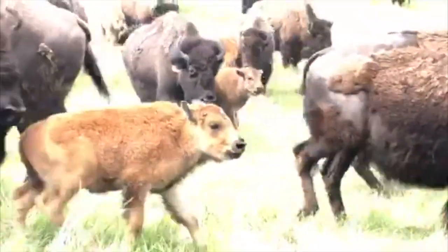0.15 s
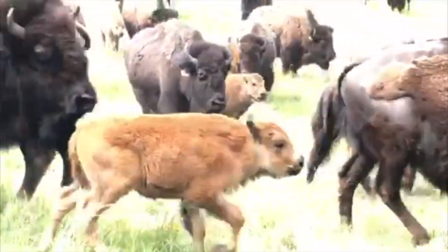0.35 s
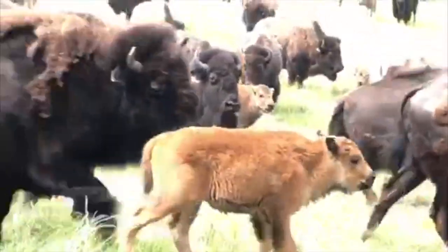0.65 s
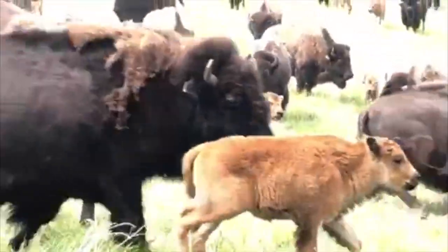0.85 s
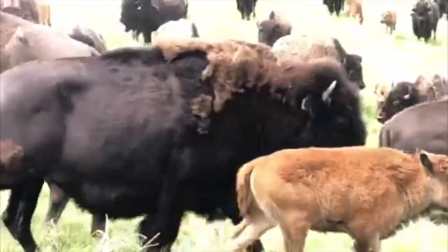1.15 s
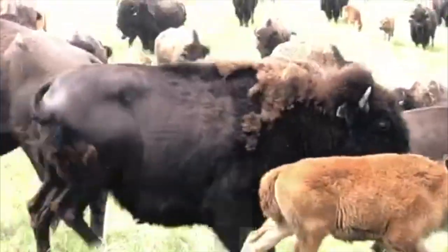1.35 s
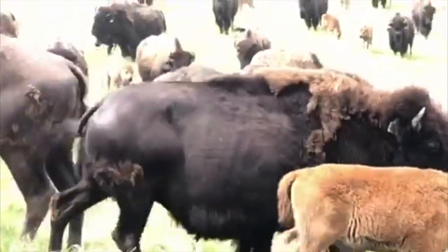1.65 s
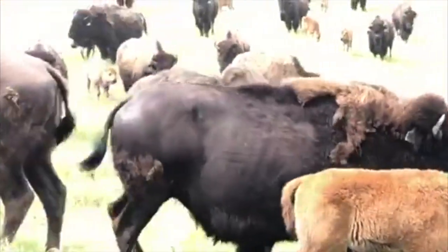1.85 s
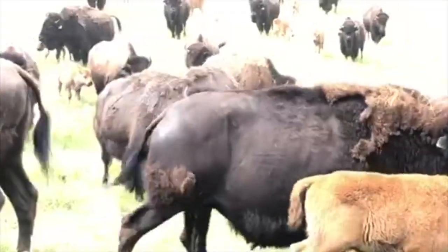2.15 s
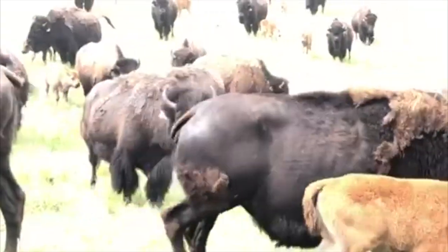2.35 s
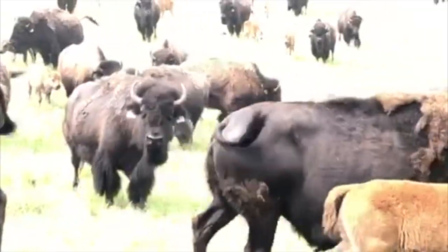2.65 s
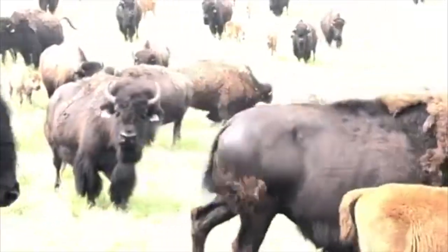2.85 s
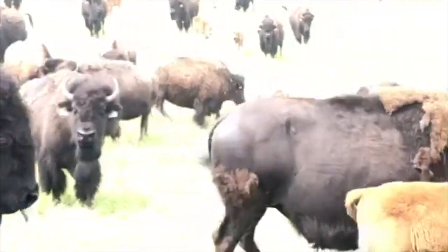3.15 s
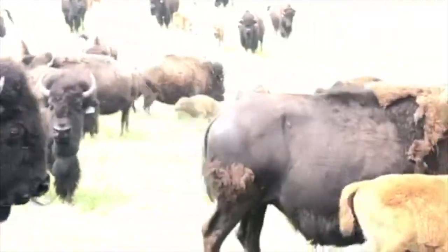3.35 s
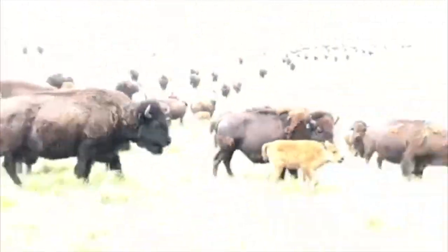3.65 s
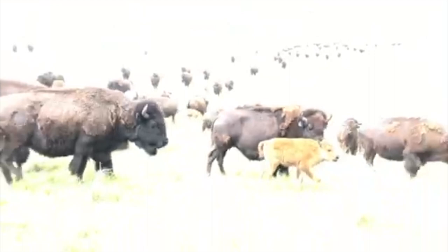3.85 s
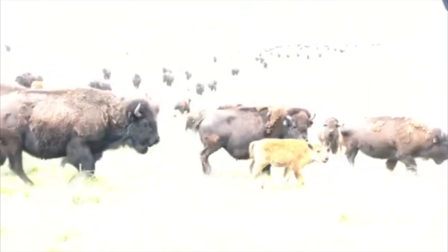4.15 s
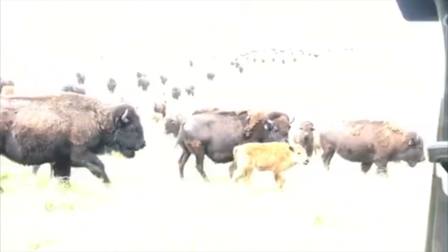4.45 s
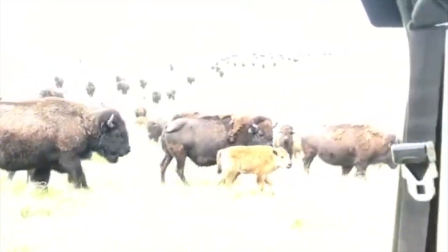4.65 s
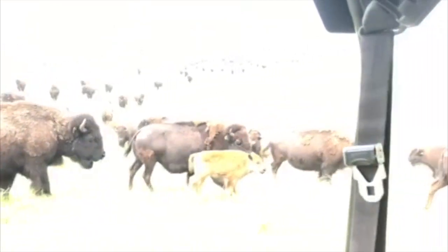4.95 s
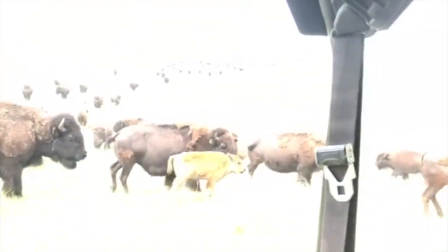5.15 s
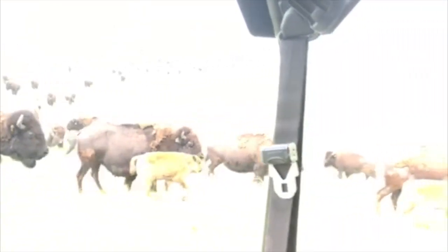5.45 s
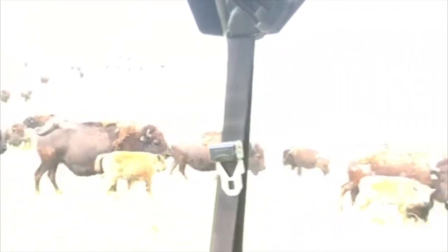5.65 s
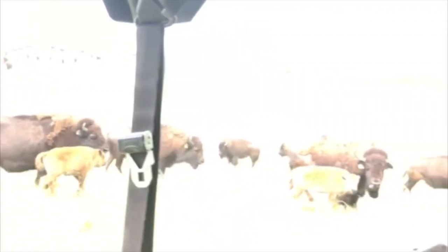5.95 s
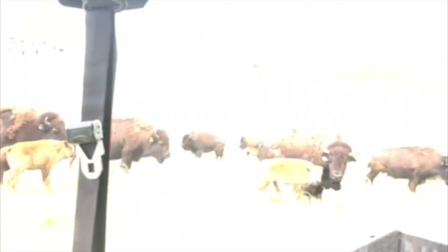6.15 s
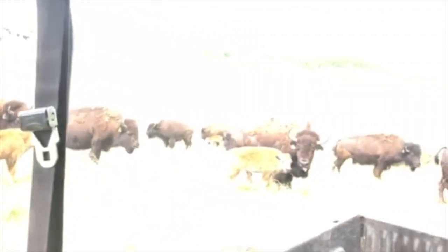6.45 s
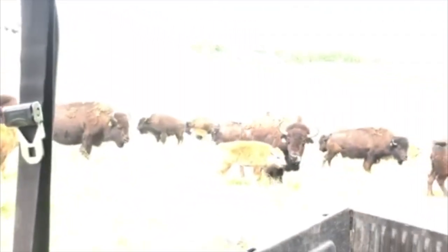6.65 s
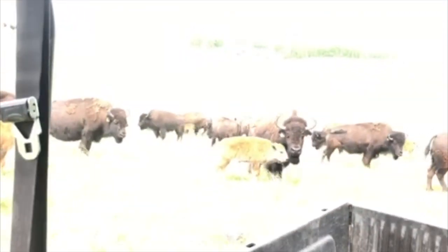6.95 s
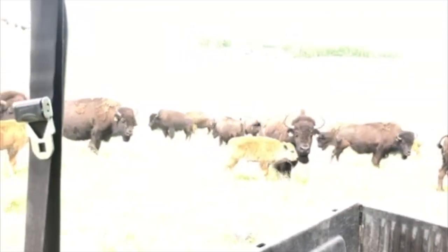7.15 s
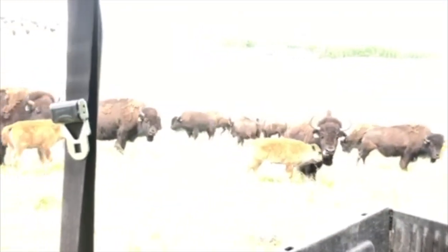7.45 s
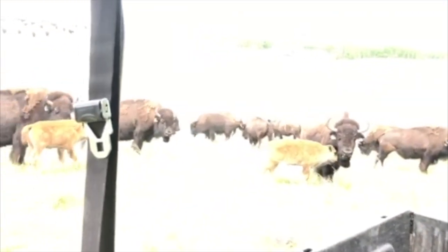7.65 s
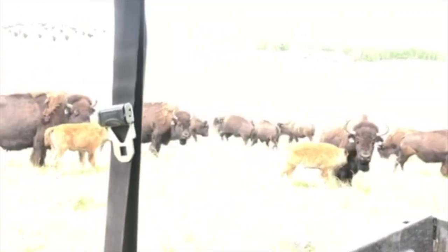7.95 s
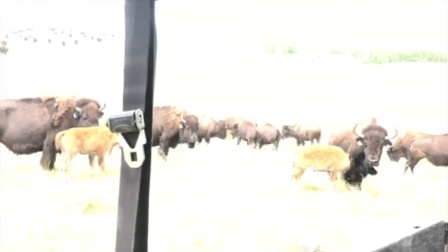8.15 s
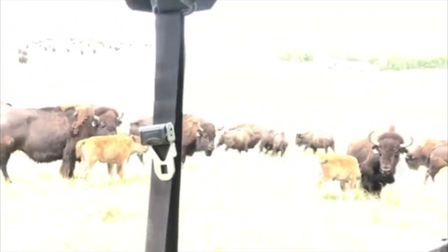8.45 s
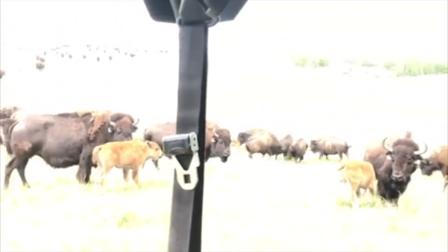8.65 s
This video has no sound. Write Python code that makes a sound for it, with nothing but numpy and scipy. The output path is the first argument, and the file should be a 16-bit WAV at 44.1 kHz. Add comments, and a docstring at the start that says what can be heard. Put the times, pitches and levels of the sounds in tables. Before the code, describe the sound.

Throughout about 9 seconds, a bison herd makes a low, uneven bed of dull hoof thuds, muffled distant grunts, dry scuffing and fine grass rustle, quieter after about 7 s. A close, rough grunt comes at 0.4-0.6 s, a rapid rattle of deep throaty pulses, about thirty per second, with chesty and nasal ring. From 1 to 4 s there are muffled farther grunts around 1.3 and 2.7, heavy treads, and crisp stalk snaps, sharpest at 2.4-2.7, another at 3.4. Short grunts follow at 4.0, 4.5, a faint one at 5.0, 5.2, a stronger one at 5.6, a raspy one at 6.3 with a weak tail at 6.6, and a strong clearer one at 6.9. Thin, mostly falling bird chirps come at 7.5-7.9 and 8.35-8.7. The loudest, roughest grunt at 7.9 runs into another until 8.3, with nostril hiss. Close, dry, open-air perspective with slight short reflections.

```python
"""A bison herd walks past over open pasture, some animals very close.
From the start shaped noise makes the herd's rumble and the grass swish; filtered bursts make scuffs and snaps.
Soon the grunts begin: trains of slow glottal pulses ring chest, mouth and nose, some with a breathy hiss.
Late on, a far bird chirps in short gliding sines, and bursts of air hiss through the nostrils."""
import sys
import numpy as np
from scipy import signal
from scipy.fft import rfft, irfft, next_fast_len
from scipy.io import wavfile

SR = 44100
rng = np.random.default_rng(int(sys.argv[2]) if len(sys.argv) > 2 else 0)


def output_pcm(signal):
    """Save a mono or channel-first signal as 16-bit PCM at the path in sys.argv[1].

    Samples are clipped to [-1, 1] before scaling.
    """
    pcm = np.clip(np.atleast_2d(signal).T, -1, 1) * 32767
    wavfile.write(sys.argv[1], SR, np.round(pcm).astype(np.int16))


N = 388962
T = np.arange(N) / SR   # s

# Levels in the tables are nominal: the sources apply their own trims.
# steady stir of the herd: time_s, thuds_db, far_voices_db, scuffing_db
HERD_STIR = [(0, -51, -55, -53), (.75, -48.5, -51.5, -53.5), (1.5, -50, -52.5, -55),
             (3.3, -49, -54.5, -56.5), (4.4, -51.5, -53.5, -57.5), (6.75, -50, -54.5, -57),
             (7.3, -54.5, -60, -58.5), (8.82, -59, -58.5, -56.5)]
# spectrum of the ground thuds: freq_hz, density_db_per_hz
THUD_SPECTRUM = [(25, -50), (40, -8), (56, -6.5), (75, 3.5), (115, 2.5)]
# spectrum of the far voices: freq_hz, density_db_per_hz
RUMBLE_SPECTRUM = [(135, -8), (172, 2.5), (215, -5), (280, -9.5), (350, -9), (410, -22), (520, -25.5)]
# spectrum of scuffing and far breath: freq_hz, density_db_per_hz
SCUFF_SPECTRUM = [(300, -3.5), (500, 2), (800, 1.5), (1150, 1), (1600, -3.5), (2300, -8), (3200, -12)]
# dull thuds of heavy treading: middle_s, length_s, level_db
HEAVY_TREADS = [(1.968, 0.071, -48), (2.56, 0.1, -46.5), (2.726, 0.044, -41), (3.026, 0.11, -43),
                (3.59, 0.094, -49), (3.973, 0.12, -45), (6.005, 0.19, -44), (6.617, 0.08, -45),
                (7.67, 0.21, -52.5), (8.496, 0.32, -42.5)]
# muffled grunts and snorts farther off, and at 5.826 s the breath trailing off after the close grunt just
# before: middle_s, length_s, voice_db, breath_db
FAR_CALLS = [(0.223, 0.085, -50.5, -58), (1.14, 0.1, -46.5, -57), (1.31, 0.075, -41, -49.5),
             (1.386, 0.06, -40, -52), (1.923, 0.094, -43.5, -46.5), (2.502, 0.12, -50, -53),
             (2.699, 0.056, -41.5, -44.5), (3.059, 0.15, -43, -55), (3.595, 0.077, -48, -80),
             (5.445, 0.097, -49.5, -58.5), (5.826, 0.1, -60, -55), (5.99, 0.2, -51, -63),
             (6.386, 0.28, -46.5, -70), (8.41, 0.28, -51, -69), (8.638, 0.11, -52.5, -52.5)]
# rustle of the grass, louder while animals pass close: time_s, level_db
GRASS_LEVEL = [(0, -53.5), (1.7, -52.5), (2.05, -53.5), (2.8, -49), (3.55, -52), (3.75, -55), (4.7, -57),
               (7.1, -56), (7.35, -59.5), (7.9, -59.5), (8.4, -55), (8.82, -55.5)]
# spectrum of the grass: freq_hz, density_db_per_hz
GRASS_SPECTRUM = [(1500, -7), (2400, -6.5), (3400, 2), (6000, 2), (8500, -0.5), (12000, -1), (16000, -2.5)]
# a leg sweeps through tall grass: middle_s, length_s, level_db
LEG_SWEEPS = [(.38, 0.94, -53.5), (1.857, 0.14, -52.5), (2.21, 0.12, -51.5), (3.2, 0.034, -51),
              (3.953, 0.03, -48), (4.9, 0.027, -58), (6.522, 0.22, -55), (7.03, 0.089, -55.5),
              (8.433, 0.13, -55.5)]
# far bird: start_s, length_s, start_hz, end_hz, level_db
BIRD_CHIRPS = [(7.523, 0.043, 4060, 3740, -55), (7.69, 0.051, 4200, 3540, -50),
               (7.765, .02, 5000, 4670, -55), (7.8, 0.034, 4200, 3470, -53), (7.904, 0.04, 4300, 3400, -51),
               (8.353, 0.027, 5300, 4300, -51), (8.434, 0.042, 3400, 3960, -48),
               (8.494, 0.036, 4600, 3840, -50), (8.59, 0.047, 4560, 3870, -49),
               (8.68, 0.013, 4000, 3650, -45), (8.704, 0.033, 4400, 3680, -47.5)]
# hoof scuffs and snapping stalks: start_s, level_db, centre_hz, width_octaves, decay_s
SCUFFS_AND_SNAPS = [(0.031, -37, 525, 0.63, 0.0021), (0.258, -41.5, 510, 0.46, 0.0027),
                    (0.369, -43, 1960, 1.4, 0.0027), (0.739, -42.5, 460, 0.82, 0.0079),
                    (0.768, -46, 540, 1.1, 0.0021), (0.932, -43, 1790, 0.83, 0.0026),
                    (0.953, -45, 830, 1, 0.0019), (1.218, -46, 5200, 0.84, 0.011),
                    (1.605, -43, 920, 0.88, 0.0021), (2.275, -40, 5870, 2.1, 0.01),
                    (2.419, -38, 7000, 2.3, 0.0091), (2.435, -25.5, 6760, 1.7, 0.00031),
                    (2.488, -34, 4600, 0.69, 0.00079), (2.593, -40.5, 1010, 1.4, 0.0019),
                    (2.655, -33, 2100, 2.6, 0.0039), (2.659, -24.5, 6460, 1.1, 0.00032),
                    (2.689, -42.5, 5000, 2.2, 0.012), (2.81, -44.5, 3860, 1.8, 0.0044),
                    (2.856, -40.5, 8000, 2.5, 0.0034), (2.936, -49, 990, 0.7, 0.0026),
                    (2.98, -48, 12000, 0.76, 0.028), (3.399, -33, 3260, 3.3, 0.0017),
                    (3.57, -43, 8900, 2, 0.0059), (4.849, -41.5, 5500, 8.6, 0.0028),
                    (6.712, -49, 5170, 1.6, 0.0036), (6.793, -47, 820, 0.45, 0.019),
                    (6.857, -34.5, 5360, 0.85, 0.0019), (7.725, -32.5, 4200, 1.77, 0.0014),
                    (8.49, -42.5, 9000, 4, 0.0017), (8.769, -40, 8950, 3, 0.0025)]
# the grunts, the last two run together: first_pulse_s, last_pulse_s, pulses,
#   slowing (share by which the last period exceeds the mean), peak_db, attack_s, swell_db,
#   catch_db (dip in mid-attack), fade_db, openness_db (upper resonances against low ones),
#   roughness (0-1), roughest_at (share of the call)
GRUNT_CALLS = [(0.359, 0.616, 8, -0.0015, -31, 0.059, 9, 3.5, 10, -17, 0.84, 0.62),
               (4.024, 4.118, 4, 0.017, -38, 0.038, -1, 0, -0.5, -15, 0.15, 0.24),
               (4.49, 4.698, 6, -0.028, -37.5, 0.16, 6.5, -2.5, 3.5, -22.5, 0.5, 0.46),
               (4.966, 5.101, 4, 0.0097, -49.5, 0.058, 2, -5, 8, -9.5, 0, 0.4),
               (5.213, 5.341, 4, 0.032, -41.5, 0.024, 7, 2, 6, -10.5, 0.13, 0.57),
               (5.579, 5.787, 7, 0.07, -34, 0.057, 10.5, 12, 3.5, -15.5, 0.28, 0.58),
               (6.302, 6.545, 11, -0.061, -38.5, 0.15, 3.5, 1, 6, -18.5, 0.84, 0.87),
               (6.586, 6.694, 4, 0.0045, -50, .03, -1, 0, 4, -9.5, 0.08, 0.62),
               (6.891, 7.068, 6, 0.015, -30, 0.053, 6.5, 9, 5, -10.5, 0.09, 0.15),
               (7.941, 8.134, 7, -0.0022, -28.5, 0.046, 9.5, 2.5, 5, -15, 0.92, 0.73),
               (8.166, 8.271, 4, 0.0364, -30, 0.033, 2, -6, 7, -12.5, 0.42, 0.6)]
# colour of each grunt: chest_scale (ratio), chest_tilt_db_per_octave,
#   glide (share by which the muzzle and chest resonances rise over the call), wobble (share, pulse to pulse),
#   nostril_breath_db, muzzle_breath_db, chest_rough_share (of the roughness)
GRUNT_COLOURS = [(1.04, -1, 0.05, 0.012, -20.5, -28.5, 0.34), (0.946, -1.5, .002, 0.0036, -28, -28, .5),
                 (0.96, -2.5, 0.026, .008, -22, -37, 0.9), (1.03, 7.5, 0.036, 0.0048, -28, -32, .5),
                 (0.94, -0.5, -0.019, 0.004, -11, -34, .5), (0.963, 2.5, 0.01, 0.016, -25, -29, .3),
                 (1.154, -0.5, 0.0054, 0.0086, -31, -24.5, 0.97), (0.89, 2.5, 0.019, .008, -24, -13.5, .5),
                 (0.934, 4, 0.032, 0.0068, -27, -32.5, 0.36), (1.0, 3.5, 0.023, 0.03, -15.5, -30, 0.89),
                 (0.933, 5.5, 0.0075, 0.012, -15.5, -33, .15)]
# jaw and muzzle shape, one list per grunt, before glide and wobble: freq_hz, width_hz, level_db
MUZZLE_MODES = [
    [(520, 110, 7.5), (670, 200, 3), (930, 160, 1), (1140, 130, 6), (1690, 92, 1.5), (2070, 54, 1),
     (2650, 120, -12), (4300, 400, -11)],
    [(590, 90, -11), (1060, 260, -14), (1493, 85, 2.5), (1730, 93, -5), (2400, 80, -14), (3190, 83, -18),
     (3720, 100, -10), (3960, 71, -18)],
    [(533, 110, 5), (700, 230, 5), (1160, 420, 1.5), (1700, 400, -9)],
    [(920, 280, -7), (1570, 170, 1), (1880, 130, 0), (3330, 300, -17)],
    [(740, 180, -8), (1000, 200, -0.5), (1210, 180, 2), (1690, 100, 1.5), (1840, 90, -1), (3000, 260, -7),
     (3650, 240, -11.5), (4800, 240, -13)],
    [(513, 110, -0.5), (706, 95, -4.5), (920, 99, -4.5), (1137, 76, 1.5), (1367, 67, -5), (1670, 103, -3.5),
     (2034, 54, -4.5), (2700, 140, -6), (2850, 110, -14), (4400, 400, -15.5)],
    [(620, 120, -3), (1230, 73, 3), (1730, 54, -5), (2740, 65, 0), (3090, 70, 4), (3290, 60, -6),
     (5100, 150, -9)],
    [(1570, 200, 2.5), (1920, 250, -3), (2610, 450, -12)],
    [(540, 110, -4.5), (840, 150, -2.5), (1110, 170, -0.5), (1392, 64, -0.5), (1492, 40, 1),
     (1714, 78, -2.5), (2100, 130, -15), (2660, 180, -17), (2860, 140, -21.5), (4600, 250, -23)],
    [(564, 120, -5.5), (710, 45, 1.5), (900, 150, -1.5), (1140, 91, -10), (1360, 140, -15), (1640, 98, -6),
     (1763, 120, -4.5), (2100, 100, -11.5), (2820, 180, -11), (3260, 100, -9)],
    [(552, 90, -1), (740, 150, -20), (867, 136, 2.5), (1190, 190, -5), (1360, 82, -6), (1710, 120, -5),
     (2100, 71, -12), (2740, 110, -19.5), (4500, 360, -20.5)],
]
# chest and throat before each grunt's scale and tilt: freq_hz, width_hz, level_db
CHEST_MODES = [(84.7, 59, 7.5), (175, 57, 2), (241, 56, -4), (310, 28.3, 3)]
# flared nostrils before scaling: freq_hz, width_hz, level_db
NOSTRIL_MODES = [(2780, 130, 2.5), (3347, 91, 2.5), (3760, 230, 3), (4240, 170, -11), (4600, 160, 1),
                 (5200, 170, -1), (6200, 140, -7), (7320, 370, -1), (8200, 300, -1.5), (9660, 200, -3.5),
                 (10200, 340, -3), (10900, 270, -2), (11900, 200, 0), (12700, 280, -6), (14900, 400, -5)]
# spectrum of air through the nostrils: freq_hz, density_db_per_hz
BREATH_SPECTRUM = [(900, -39), (1750, 12), (2350, -16), (2750, -8), (3800, 8), (5500, -5), (8000, -1),
                   (12000, -4), (15500, -1)]
# air bursts through the nostrils in the hardest grunt: start_s, level_db
NOSTRIL_SPURTS = [(8.035, -46), (8.069, -62), (8.107, -47), (8.135, -37.5)]

CUTOFF_HZ = 15900
BELL_POWER = 2.9   # swells of the beds: a higher power flattens the top
FADE_SHARE = 0.23   # last share of a grunt, over which it fades
# rough stretch: half-width as a share of the call; share of the roughness always there
ROUGH_WIDTH, ROUGH_BASE = 0.27, 0.14
# the mouth opens toward the end; a rough voice has a weaker slap and sounds duller
LATE_OPENING_DB, ROUGH_DULLING_DB = 4.5, 7
# in weak pulses and in the fade the chest gives out before the mouth (dB of openness per dB)
WEAK_OPENING, FADE_OPENING = 0.092, 0.098
SHIMMER_DB = 0.6   # random spread of strength from pulse to pulse
EXHALE_ATTACK_S, EXHALE_TAIL_S = 0.01, 0.06
SPURT_DECAY_S = 0.0051


def from_db(db):
    """Decibels to gain."""
    return 10 ** (np.asarray(db) / 20)


def rms_one(x):
    """Scale to rms 1."""
    return x / np.sqrt(np.mean(x ** 2) + 1e-20)


def noise(size=N):
    """White Gaussian noise."""
    return rng.standard_normal(size)


def curve(rows, t):
    """Columns of a control table at times t."""
    time_s, *columns = np.transpose(rows)
    return [np.interp(t, time_s, column) for column in columns]


def add(out, start_s, sound):
    """Mix a short sound in at start_s."""
    i = max(0, round(start_s * SR))
    out[i:i + len(sound)] += sound[:N - i]


def band(x, low_hz, high_hz, order=3):
    """Causal band-pass."""
    edges_hz = [low_hz, min(high_hz, .45 * SR)]
    return signal.sosfilt(signal.butter(order, edges_hz, "band", fs=SR, output="sos"), x)


def colour(x, spectrum):
    """Shape noise by a spectrum that falls steeply past its ends; rms 1."""
    hz, db = np.transpose(spectrum)
    size = next_fast_len(len(x))
    f = np.maximum(np.arange(size // 2 + 1) * SR / size, 1)
    skirts = np.minimum(1, np.minimum(f / hz[0], hz[-1] / f)) ** 4
    gain = from_db(np.interp(np.log(f), np.log(hz), db)) * skirts
    return rms_one(irfft(rfft(x, size) * gain, size)[:len(x)])


def drift(rate_hz):
    """Random wander of unit spread, with rate_hz new values a second."""
    return np.interp(T * rate_hz, np.arange(8000), noise(8000))


def waver(x, share, rate_hz):
    """Let the pitch of a sound wander by this share."""
    t = T[:len(x)]
    return np.interp(t + share * np.cumsum(drift(rate_hz)[:len(x)]) / SR, t, x)


def swells(bed_db, rows):
    """Gain of a bed with bell-shaped swells (middle_s, length_s, level_db); powers add."""
    power = from_db(bed_db) ** 2
    for middle_s, length_s, db in rows:
        near = np.abs(T - middle_s) < 2 * length_s
        bell = np.exp(-np.abs(2 * (T[near] - middle_s) / length_s) ** BELL_POWER)
        power[near] += from_db(db) ** 2 * bell
    return np.sqrt(power)


def resonate(x, modes, scale, order=1):
    """Parallel resonances; at order 2 each acts twice, which deepens the valleys between them."""
    out = np.zeros(len(x))
    for hz, width_hz, db in modes:
        r = np.exp(-np.pi * width_hz / SR)
        w = 2 * np.pi * hz * scale / SR
        section = [0, (1 - r) * np.sin(w), 0, 1, -2 * r * np.cos(w), r * r]
        out += from_db(db) * signal.sosfilt([section] * order, x)
    return out


def herd(thuds_db=-1.5, rumble_db=1.3, scuff_db=-3.0, throb_db=2.0, patchy_db=2.5):
    """Footfalls and farther grunts merge into a throbbing rumble with dry scuffing and breath above it."""
    deep_db, low_db, mid_db = curve(HERD_STIR, T)
    treading = swells(deep_db, HEAVY_TREADS)
    voices = swells(low_db, [(s, length_s, db) for s, length_s, db, _ in FAR_CALLS])
    breaths = swells(mid_db, [(s, length_s, db) for s, length_s, _, db in FAR_CALLS])
    thuds = treading * from_db(thuds_db) * colour(noise(), THUD_SPECTRUM)
    rumble = voices * from_db(rumble_db + throb_db * drift(55)) * colour(noise(), RUMBLE_SPECTRUM)
    scuff = breaths * from_db(scuff_db + patchy_db * drift(90)) * colour(noise(), SCUFF_SPECTRUM)
    return thuds + rumble + scuff


def grass(swish_db=-1.4, crackle_db=-12.0, stalks_per_s=900, spread_db=7.5, clump_db=-0.5, patchy_db=2.0):
    """Blades sliding on legs hiss; single stalks crackle at random, their strength drifting."""
    level_db, = curve(GRASS_LEVEL, T)
    sizes = from_db(spread_db * np.minimum(rng.exponential(1, N), 5) + clump_db * drift(30))
    stalks = (rng.random(N) < stalks_per_s / SR) * sizes * rng.choice([-1, 1], N)
    swish = from_db(swish_db + patchy_db * drift(40)) * colour(noise(), GRASS_SPECTRUM)
    crackle = from_db(crackle_db) * colour(stalks, GRASS_SPECTRUM)
    return swells(level_db, LEG_SWEEPS) * (swish + crackle)


def bird(trim_db=-6.0, arch_hz=250):
    """Short whistles, arched in pitch and strength."""
    out = np.zeros(N)
    for start_s, length_s, from_hz, to_hz, db in BIRD_CHIRPS:
        u = np.linspace(0, 1, round(length_s * SR))
        arch = np.sin(np.pi * u)
        pitch_hz = from_hz + (to_hz - from_hz) * u + arch_hz * arch
        whistle = np.sin(2 * np.pi * np.cumsum(pitch_hz) / SR)
        add(out, start_s, from_db(db + trim_db) * arch * whistle)
    return out


def steps(grain_db=7.0, tail=0.036, tail_s=0.043, soft_s=0.04):
    """Each step or snap is a burst of breaking fibres; the longer it lasts, the softer it starts."""
    out, t = np.zeros(N), T[:SR // 10]
    for start_s, db, hz, octaves, decay_s in SCUFFS_AND_SNAPS:
        fibres = noise(len(t)) * from_db(grain_db * noise(len(t)))
        rise = 1 - np.exp(-t * soft_s / decay_s ** 2)
        fall = np.exp(-t / decay_s) + tail * np.exp(-t / tail_s)
        burst = band(fibres * rise * fall, hz * 2 ** (-octaves / 2), hz * 2 ** (octaves / 2))
        add(out, start_s, from_db(db) * rms_one(burst) * np.sqrt(decay_s / t[-1]))
    return out


def lag_bass(x, centre_hz=105, width_hz=110):
    """An all-pass delays the lowest notes, so that a pulse sweeps downward."""
    r = np.exp(-np.pi * width_hz / SR)
    a = [1, -2 * r * np.cos(2 * np.pi * centre_hz / SR), r * r]
    return signal.lfilter(a[::-1], a, x)


def bend(x, share=0.066, settle_s=0.0066):
    """After each slap the resonances start flat and slide upward as the throat recoils."""
    t = T[:len(x)]
    slide_s = share * settle_s * (1 - np.exp(-t / settle_s))
    return np.interp(t * (1 + share / 2) - slide_s, t, x)


def effort(call, t):
    """Level in dB, openness in dB and roughness 0-1 of a grunt that attacks, holds and fades."""
    first_s, last_s, _, _, peak_db, attack_s, swell_db, catch_db, fade_db, open_db, rough, rough_at = call
    u = np.clip((t - first_s) / (last_s - first_s), 0, 1)
    attack = np.clip(1 - (t - first_s) / attack_s, 0, 1)
    release_db = fade_db * np.clip(1 - (1 - u) / FADE_SHARE, 0, 1)
    slack_db = swell_db * attack + catch_db * np.sin(np.pi * attack) ** 2 + release_db
    stretch = np.exp(-((u - rough_at) / ROUGH_WIDTH) ** 4)
    breaking = rough * (ROUGH_BASE + (1 - ROUGH_BASE) * stretch)
    opening_db = LATE_OPENING_DB * u ** 2 + WEAK_OPENING * slack_db + FADE_OPENING * release_db
    return peak_db - slack_db, open_db + opening_db - ROUGH_DULLING_DB * breaking, np.clip(breaking, 0, 1)


def grunt(call, tone, muzzle, jitter_s=0.00033, rasp=0.052, rasp_s=0.0034, churn_s=0.033,
          chest_top_hz=355, mouth_top_hz=2200):
    """The vocal folds slap shut about thirty times a second; in rough stretches the flow turns turbulent."""
    first_s, last_s, pulses, slowing = call[:4]
    scale, tilt_db, glide, wobble, _, _, chest_share = tone
    u = np.linspace(0, 1, round(pulses))
    times_s = first_s + (last_s - first_s) * (u - slowing * u * (1 - u)) + jitter_s * noise(len(u))
    t = T[:SR // 8]
    chest = [(hz, width_hz, db + tilt_db * np.log2(hz / CHEST_MODES[0][0])) for hz, width_hz, db in CHEST_MODES]
    mouth = [mode for mode in muzzle if mode[0] < 2250]
    nose = [mode for mode in muzzle if mode not in mouth]
    per_cycle = np.sqrt(np.mean(np.diff(times_s)) / t[-1])   # each ring holds one period's energy
    slap = t == 0
    out = np.zeros(N)
    for start_s, progress in zip(times_s, u):
        level_db, open_db, rough = effort(call, start_s)
        deep_rough = rough * np.clip(chest_share, 0, 1)
        size = 1 + glide * (progress - .5) + wobble * rng.standard_normal()
        churn = rms_one(noise(len(t)) * np.exp(-(t / churn_s) ** 2)) / np.sqrt(len(t))
        flow = np.sqrt(1 - rough) * slap + np.sqrt(rough) * churn
        deep_flow = np.sqrt(1 - deep_rough) * slap + np.sqrt(deep_rough) * churn
        airy = flow + rasp * noise(len(t)) * np.exp(-t / rasp_s)   # a little air escapes after each slap
        low = lag_bass(band(resonate(deep_flow, chest, scale * size), 61.7, chest_top_hz, order=5))
        mouth_ring = band(resonate(airy, mouth, size, order=2), 364, mouth_top_hz, order=6)
        nose_ring = band(resonate(airy, nose, size, order=2), 2200, 7500, order=4)
        ring = rms_one(low) + from_db(open_db) * rms_one(bend(mouth_ring + nose_ring))
        strength = from_db(level_db + SHIMMER_DB * rng.standard_normal())
        add(out, start_s, -strength * per_cycle * ring)
    return out


def exhale(call, tone, muzzle, low_hz=1150, top_hz=5500, flutter_db=5.0):
    """Breath sings in the muzzle resonances between and just past the pulses, wavering as the jaw moves."""
    first_s, last_s, _, _, peak_db = call[:5]
    t = T[:SR]
    sung = band(resonate(noise(len(t)), muzzle, 0.94, order=2), low_hz, top_hz)
    air = rms_one(waver(sung, 0.0224, 40))
    tail = np.exp(-np.maximum(0, t - (last_s - first_s)) / EXHALE_TAIL_S)
    flow = np.minimum(1, t / EXHALE_ATTACK_S) * tail
    return from_db(peak_db + tone[5] + flutter_db * drift(52.2)[:len(t)]) * flow * air


def bison(flutter_db=3.0, hiss_db=-9.0, nostril_db=-3.5, run_on_s=0.033):
    """All the grunts; the rougher the voice, the more air rushes through the nostrils."""
    voice, airflow = np.zeros(N), np.zeros(N)
    for call, tone, muzzle in zip(GRUNT_CALLS, GRUNT_COLOURS, MUZZLE_MODES):
        voice += grunt(call, tone, muzzle)
        add(voice, call[0], exhale(call, tone, muzzle))
        during = (T > call[0]) & (T < call[1] + run_on_s)
        level_db, _, rough = effort(call, T[during])
        airflow[during] = from_db(level_db + tone[4]) * np.sqrt(rough)
    for start_s, db in NOSTRIL_SPURTS:
        add(airflow, start_s, from_db(db) * np.exp(-T[:SR // 20] / SPURT_DECAY_S))
    hiss = from_db(hiss_db) * colour(noise(), BREATH_SPECTRUM)
    nostrils = band(resonate(noise(), NOSTRIL_MODES, 0.96, order=2), 1900, 16000)
    ringing = waver(from_db(nostril_db) * rms_one(nostrils), 0.01, 60)
    return voice + airflow * from_db(flutter_db * drift(120)) * (hiss + ringing)


def scatter(x, near_db=-5.5, near_s=0.0037, far_db=-17.0, far_s=0.066, low_hz=300, top_hz=5000):
    """Quick reflections from bodies and a parked vehicle, then a faint tail over the field."""
    t = T[:SR // 3]
    near = from_db(near_db) * rms_one(np.exp(-t / near_s))
    far = from_db(far_db) * rms_one(np.exp(-t / far_s))
    echoes = band(noise(len(t)) * (near + far) * (t > .003), low_hz, top_hz) / np.sqrt(len(t))
    return x + signal.fftconvolve(x, echoes)[:N]


def scene():
    """Grunts, steps and bird with reflections, over the dry beds of herd and grass."""
    bed = herd() + grass()
    return (bed + scatter(bird() + steps() + bison()))[None]


def record(dry):
    """Steep low-pass at CUTOFF_HZ."""
    return signal.sosfilt(signal.ellip(12, .1, 70, CUTOFF_HZ, fs=SR, output="sos"), dry)


dry = scene()
out = record(dry)
output_pcm(out)
```